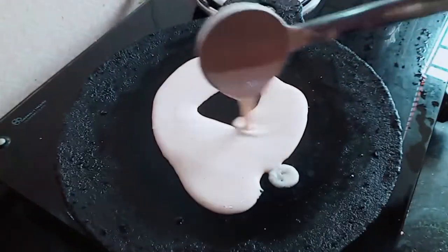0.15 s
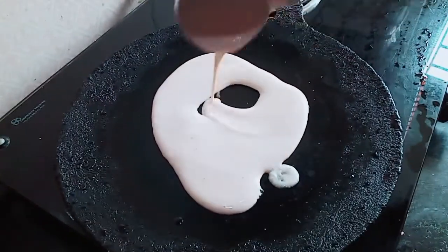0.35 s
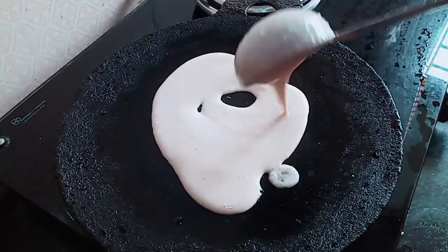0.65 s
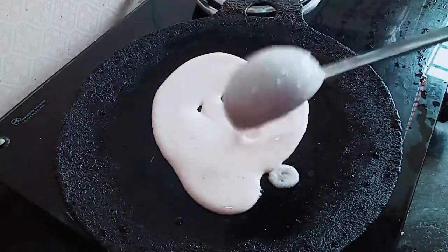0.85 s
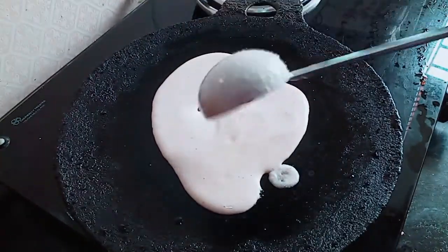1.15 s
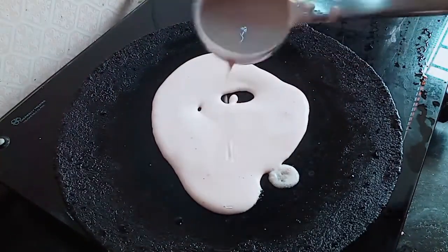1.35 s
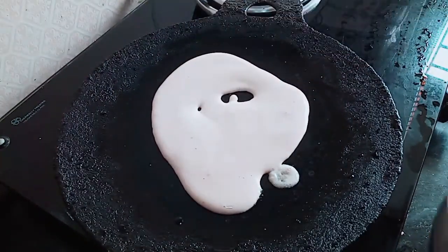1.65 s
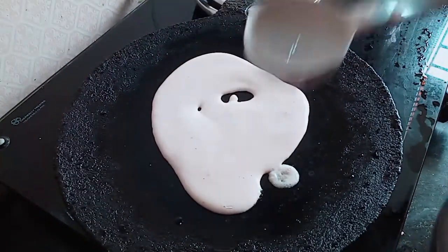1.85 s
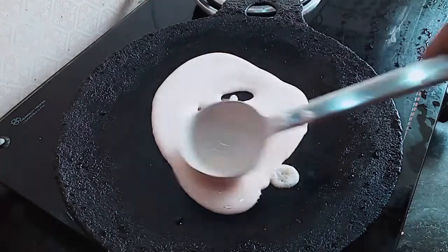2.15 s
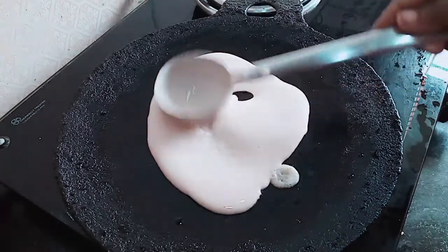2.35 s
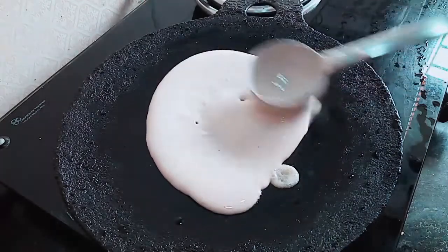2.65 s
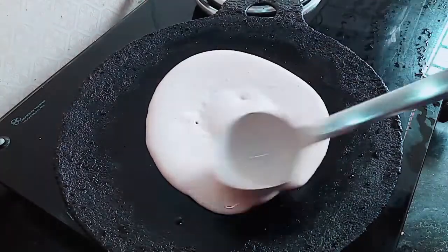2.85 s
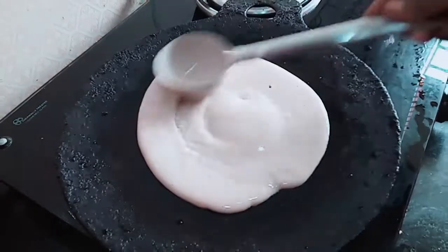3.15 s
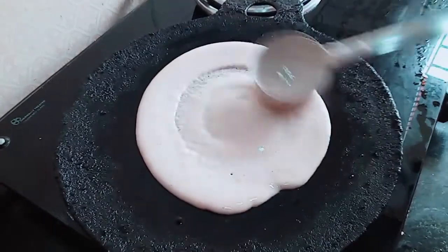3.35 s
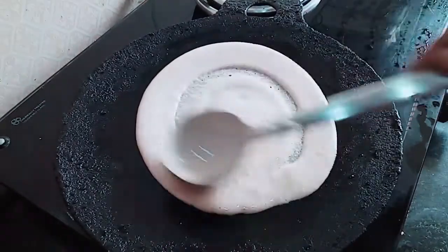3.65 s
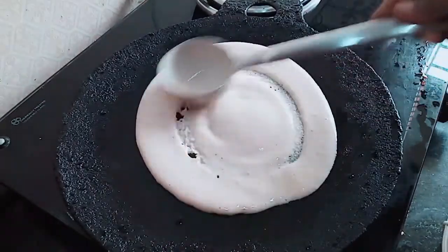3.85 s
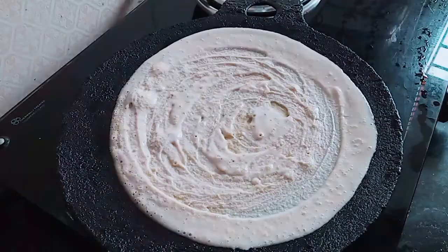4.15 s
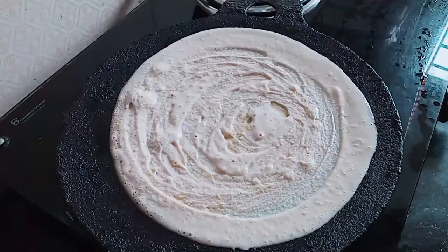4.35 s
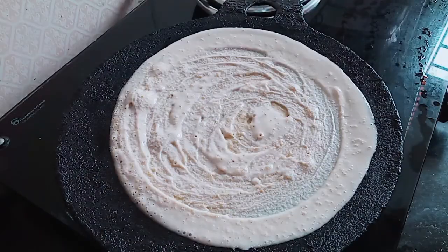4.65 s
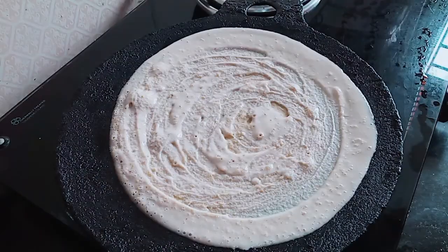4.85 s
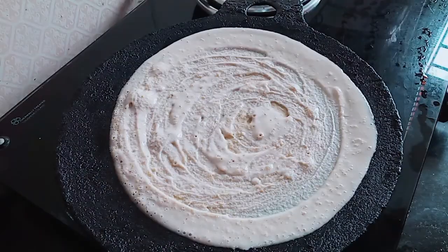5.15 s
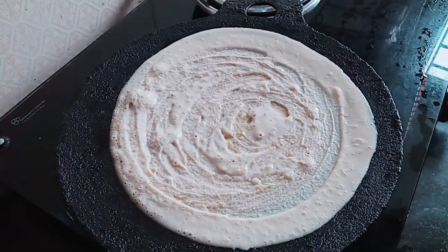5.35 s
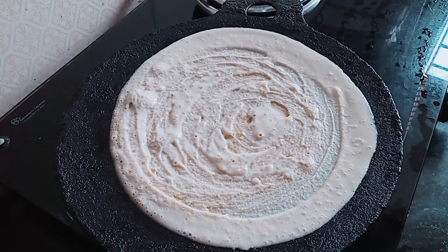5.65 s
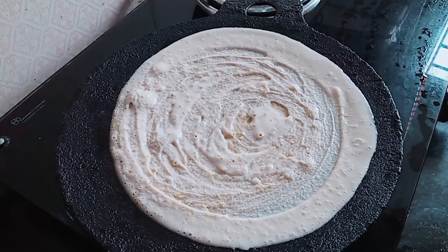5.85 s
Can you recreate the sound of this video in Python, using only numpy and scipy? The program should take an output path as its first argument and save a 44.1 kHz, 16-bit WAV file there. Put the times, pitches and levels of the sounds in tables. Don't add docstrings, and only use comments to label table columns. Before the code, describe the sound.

Wet batter sizzles and crackles on a hot iron pan over a low hum, then abruptly gives way to brief metallic ladle scrapes and knocks.

```python
import sys
import numpy as np
from scipy import signal
from scipy.fft import rfft, irfft
from scipy.io import wavfile
from scipy.ndimage import uniform_filter1d

SR = 44100
rng = np.random.default_rng(int(sys.argv[2]) if len(sys.argv) > 2 else 0)


def generate_wav(signal):
    frames = np.transpose(np.atleast_2d(signal))
    scaled = np.clip(frames, -1, 1) * 32767
    pcm = np.round(scaled).astype(np.int16)
    wavfile.write(sys.argv[1], SR, pcm)


def convert_level_to_amplitude(level_db):
    exponent = np.asarray(level_db, float) / 20
    return 10 ** exponent


N = 264600
TIME = np.arange(N) / SR
SCENE_CHANGE_S = 4.066

# t/s, vigour level/dB, large over small bubbles level/dB, rim steam over vigour level/dB
BOILING = [(0.0, -26, 4, 0.5), (0.29, -28.5, -2.5, -0.5), (0.33, -24, -5, 1.5), (0.62, -24, 0, 0.5),
           (0.98, -27, -2, -5), (1.22, -30, 3.5, -7), (1.46, -34, 3.5, 0), (1.56, -32, 0.5, 7),
           (1.8, -33, -3, -7), (2.33, -39, 1.5, -5), (2.46, -38, 3, 3.5), (2.58, -33, -8.5, 4),
           (2.78, -28.5, -3, -0.5), (2.93, -29.5, -1, -6.5), (3.08, -30.5, 1.5, 1), (3.17, -32, 1.5, -5.5),
           (3.37, -31.5, -0.5, -1), (4.06, -32.5, 0, -9.5)]
# t/s, level/dB
WETNESS = [(0.0, -34), (0.3, -37.5), (0.6, -35.5), (0.93, -38.5), (1.2, -42), (1.45, -41.5), (1.58, -38),
           (2.3, -50.5), (2.72, -46.5), (3.09, -47.5), (3.18, -57), (3.4, -51), (3.47, -49), (3.68, -47),
           (3.85, -51), (4.06, -38.5)]
# f/Hz, level/dB
BUBBLE_SPECTRUM = [(400, -10), (600, -17.5), (790, -3), (1100, -4), (1380, -1), (1950, -1.5), (2800, 0.5),
                   (3700, -2.5), (4500, -13), (6000, -8)]
# f/Hz, level/dB
STEAM_SPECTRUM = [(2470, -8), (4200, 5), (4660, -2.5), (5030, -1), (6700, -1), (7650, 3.5), (8360, 6),
                  (9950, -9.5), (11000, -13), (14300, -45), (22000, -120)]
# f/Hz, level/dB
SPRAY_SPECTRUM = [(5880, -14), (10000, -1.5), (11400, -2.5), (14900, -0.5), (15700, -9), (16000, -15)]
# f/Hz, level/dB
CRACK_SPECTRUM = [(500, -66), (2000, -18), (4500, -7), (6500, 4.5), (8300, 12.5), (10000, 3), (15000, -3.5),
                  (16500, -8)]
# t/s, peak level/dB
POUR_DROPLETS = [(0.1406, -11), (0.9098, -10), (0.367, -14), (0.782, -12), (0.9564, -9), (1.053, -22),
                 (1.195, -11), (1.271, -18), (1.34, -13), (1.3786, -15), (1.472, -12), (1.517, -7),
                 (1.6153, -10), (1.6472, -10), (1.718, -10.5), (1.7788, -13), (1.8054, -17), (1.867, -11),
                 (1.925, -11.5), (1.938, -11), (1.953, -18), (1.9817, -12.5), (2.0595, -17), (2.1412, -18),
                 (2.2495, -15.5), (1.917, -28), (2.358, -8.5), (2.448, -22)]
# t/s, peak level/dB
SPREAD_DROPLETS = [(2.6655, -14), (2.7394, -16), (2.597, -9), (2.6464, -15), (2.692, -9.5), (2.7276, -9),
                   (2.7606, -8.5), (2.802, -14), (2.8878, -16), (2.9717, -16), (3.0148, -11.5),
                   (3.062, -14), (3.118, -15), (3.044, -18), (3.4554, -19), (3.512, -9.5), (3.5523, -20),
                   (3.623, -12.5), (3.662, -9.5), (3.5803, -21), (3.714, -13), (3.742, -14), (3.764, -12.5),
                   (3.82, -16), (3.8457, -22), (3.8723, -12.5), (3.933, -12), (3.9487, -15), (3.985, -23),
                   (4.0147, -10.5)]
# t/s, peak level/dB, fizz level/dB
LATE_DROPLETS = [
    (5.2465, -12.5, -38),
    (5.259, -30, -15),
]
# t/s, rasp level/dB, rasp t60/s, ring level/dB, dullness/(0-1)
LADLE_KNOCKS = [(4.04, -32, 0.27, -22, 0.1), (4.156, -36, 0.2, -32, 0.4), (4.207, -40.5, 0.28, -47, 0.7),
                (4.257, -38, .2, -40, 0.5), (4.269, -26.5, 0.19, -32, 0), (4.283, -30.5, 0.8, -25, 0.86),
                (4.322, -26.5, 0.34, -32, 0.4), (4.335, -33, 0.26, -28, 0.4), (4.346, -18, 0.11, -24, 0.14),
                (4.358, -32, 0.33, -19, 0.8), (4.404, -26, 0.09, -19, 0.75), (4.412, -26, 0.11, -32, 0.99),
                (4.425, -39, 0.1, -30, 1), (4.46, -38, 1, -36, 0.3), (4.518, -9.5, 0.057, -16, 0),
                (4.533, -20, 0.18, -30, 0.46), (4.548, -28, 0.19, -31, 0.98), (4.605, -51, .2, -37, .5)]
# t/s, f/Hz, level/dB, t60/s
SINGLE_RINGS = [(4.05, 8700, -32, 0.27), (4.05, 7600, -32, .2), (4.05, 6400, -36, .2),
                (4.05, 9250, -38, .3), (4.05, 11600, -45, .25), (4.05, 12400, -44, 0.28),
                (4.05, 13700, -48, .3), (4.156, 8200, -32, 0.091), (4.165, 3900, -42, 0.43),
                (4.207, 5430, -45, .2), (4.207, 6500, -42, .1), (4.269, 6400, -37, .1),
                (4.33, 8000, -21, .1), (4.347, 3450, -24, .15), (4.347, 14500, -24, .08),
                (4.355, 12400, -30, .15), (4.36, 6400, -26, 0.18), (4.39, 14200, -34, .1),
                (4.517, 3400, -25, 0.028), (4.518, 6200, -22, .06), (4.518, 7900, -7, 0.039),
                (4.518, 9280, -22, 0.25), (4.519, 14800, -18, 0.055), (4.55, 5430, -34, 0.32),
                (4.55, 14200, -34, .15), (4.604, 5430, -39, .15)]
# f/Hz, level/dB, t60/s
VESSEL_MODES = [(1250, -14, .1), (2130, 2, .12), (2460, -10, .12), (3400, 21, 0.056), (3900, -10, .15),
                (5470, -12, 0.2), (6400, -2, .15), (7200, -7, .1), (7900, -8, 0.068), (8200, -7, 0.22),
                (8705, -8, .35), (8950, 1, 0.24), (10400, -12, .15), (11610, -14, .25), (12400, -12, .2),
                (13600, -16, .2), (14500, -5, 0.079)]
# f/Hz, level/dB
BRIGHT_RASP = [(470, -63), (800, -32), (1460, -11), (2050, -17), (2350, -30), (2700, -7), (3420, -5.5),
               (5050, -14.5), (8340, -2), (9810, -10), (12900, -18), (15200, -18), (16000, -33)]
# f/Hz, level/dB
DULL_RASP = [(290, -33), (500, -11), (740, -1.5), (831, -13), (1210, -1), (1360, -2.5), (1570, -1),
             (2570, 1), (3110, -3), (3590, 1), (5390, -17), (8330, -21), (16000, -37)]
# t/s, peak level/dB
PAN_BUMPS = [
    (3.7689, -5),
    (3.777, -27),
    (3.79, -32),
    (3.804, -18),
    (3.831, -25),
]
# f/Hz, level/dB, t60/s
PAN_MODES = [(236, -21, .1), (311, -3, 0.3), (398, -6, .32), (448, -2, 0.14), (563, 7, 0.042),
             (680, -2, 0.033), (810, 11.5, 0.036), (910, 4, 0.05)]
# t of one swell/s, rate/Hz
BLADE_SWELLS = [(2.77, 3.13), (5.3, 2.34)]
# f/Hz, level/dB
AIR_SPECTRUM = [(20, -20), (50, -11), (70, -8), (90, 0), (140, -5), (230, -12), (400, -9), (700, -11),
                (1200, -16), (3500, -21.5), (5500, -32.5), (8300, -24.5), (11000, -26.5), (13000, -42)]
# f/Hz, width/Hz, level/dB
DUCT_MODES = [(157, 7.3, 1.5), (205.4, 6.4, -4.5), (257.4, 4.9, 1), (316.5, 15, -4.5), (329, 9.1, 4.5),
              (377.3, 27, 1), (513.6, 16, -4.5), (553, 35, -6), (803, 13, -5.5)]


def sizzle():
    vigour_db, size_db, rim_db = curve(BOILING)
    spray_db, = curve(WETNESS)
    flurry = 1.7 * walk(24.73)
    fine = room(bursts(share=.08, spread_db=1.5))
    large = bubbles(np.geomspace(550, 1750, num=7)) * convert_level_to_amplitude(vigour_db + size_db / 2 + 0.083 * flurry)
    middling = bubbles(np.geomspace(2100, 2550, num=2))
    middling = middling * convert_level_to_amplitude(vigour_db - 0.25 * size_db - 3.5 + 0.17 * flurry)
    small = bubbles(np.geomspace(3100, 4600, num=3))
    small = small * convert_level_to_amplitude(vigour_db - 0.59 * size_db - 3.0 + 0.2 * flurry)
    steam = level(colour(fine, STEAM_SPECTRUM), 0) * convert_level_to_amplitude(vigour_db + rim_db + flurry - 1.0)
    spray = level(colour(fine, SPRAY_SPECTRUM), 0) * convert_level_to_amplitude(spray_db + 1.2 * flurry - 1.0)
    return large + middling + small + steam + spray + crackle(spray_db, vigour_db)


def bubbles(sizes_hz):
    out = 0
    for hz in sizes_hz:
        b, a = signal.iirpeak(hz, 7.0, SR)
        ringing = level(signal.lfilter(b, a, bursts(share=.05, spread_db=3.5)), 0)
        out = out + ringing * np.sqrt(hz) * convert_level_to_amplitude(2.02 * walk(21.96))
    return level(colour(room(out), BUBBLE_SPECTRUM), 0)


def crackle(spray_db, vigour_db):
    cracks = level(colour(room(bursts(share=.006, spread_db=4.0)), CRACK_SPECTRUM), 2.0)
    ticks = level(colour(room(bursts(share=.002, spread_db=4.0)), SPRAY_SPECTRUM), -5)
    pops = level(colour(room(bursts(share=.001, spread_db=3.5)), BUBBLE_SPECTRUM), -12)
    return (cracks + ticks) * convert_level_to_amplitude(spray_db) + pops * convert_level_to_amplitude(vigour_db)


def droplets(count=57):
    chance = rng.random((count, 2))
    s = chance[:, 0] * SCENE_CHANGE_S
    wet_db = np.interp(s, *np.transpose(WETNESS))
    stray_db = wet_db / 2 - 2 - 2 * np.log(1 - .9 * chance[:, 1])
    fizz_db = -25
    events = POUR_DROPLETS + SPREAD_DROPLETS + list(zip(s, stray_db))
    return spits([(t, db, fizz_db) for t, db in events])


def spits(events):
    crack = np.zeros(N)
    t = TIME[:SR // 30]
    burst_lag_s = .0007
    for s, peak_db, fizz_db in events:
        sound = convert_level_to_amplitude(fizz_db) * np.exp(-t / 0.01) * rng.standard_normal(len(t))
        sound[0] -= 1
        sound[rng.integers(4, 20)] += .3
        add(crack, s + burst_lag_s, convert_level_to_amplitude(peak_db) * sound)
    return room(convert_level_to_amplitude(5.5) * colour(crack, CRACK_SPECTRUM) + convert_level_to_amplitude(2.5) * colour(crack, BUBBLE_SPECTRUM))


def ladle():
    bright, dull, ringing = np.zeros((3, N))
    t = TIME[:SR // 2]
    for s, rasp_db, t60, ring_db, dullness in LADLE_KNOCKS:
        fade = convert_level_to_amplitude(rasp_db - 60 * t / t60)
        add(bright, s, fade * np.sqrt(np.clip(1 - dullness, 0, 1)))
        add(dull, s, fade * np.sqrt(np.clip(dullness, 0, 1)))
        add(ringing, s, convert_level_to_amplitude(ring_db) * ring(VESSEL_MODES, rough=.03, spread_db=4))
    for s, hz, db, t60 in SINGLE_RINGS:
        add(ringing, s, convert_level_to_amplitude(db) * ring([(hz, 0, t60)], rough=.05, spread_db=0))
    grit, drag = (level(bursts(share=0.36, spread_db=3.0), 0) * convert_level_to_amplitude(0.98 * walk(120)) for _ in range(2))
    rasp = colour(grit * bright, BRIGHT_RASP) + colour(drag * dull, DULL_RASP)
    return room(rasp) + ringing


def bumps():
    out = np.zeros(N)
    for s, peak_db in PAN_BUMPS:
        add(out, s, convert_level_to_amplitude(peak_db) * ring(PAN_MODES, rough=.01, spread_db=0))
    soft = signal.butter(2, [200, 2300], "bandpass", fs=SR, output="sos")
    return room(signal.sosfilt(soft, out))


def ring(modes, rough, spread_db):
    t = TIME[:SR // 3]
    share = convert_level_to_amplitude(spread_db * rng.standard_normal(len(modes)))
    waver = rough * np.cumsum(rng.standard_normal((len(modes), len(t))), axis=1)
    y = np.zeros(len(t))
    for gain, phase, (hz, db, t60) in zip(share, waver, modes):
        y += gain * convert_level_to_amplitude(db - 60 * t / t60) * np.sin(2 * np.pi * hz * t + phase)
    return y / np.max(np.abs(y))


def fan():
    motor_hz, blade_hz = 99.79, 121.41
    run_s, skip_s = .028, .0317
    after = TIME > SCENE_CHANGE_S
    early, late = (np.cos(2 * np.pi * rate * (TIME - s)) for s, rate in BLADE_SWELLS)
    duck_db = -1.5 * np.exp(-((TIME - 4.48) / 0.13) ** 2)
    motor_db = -23 - 1.46 * after + duck_db + 0.32 * walk(5.5)
    blade_db = -32 + 1.7 * np.where(after, 1.6 * late, early) + 1.4 * walk(7)
    clock = 2 * np.pi * (TIME + run_s + skip_s * after)
    motor = convert_level_to_amplitude(motor_db) * np.cos(motor_hz * clock + 0.04 * walk(4.9))
    blade = convert_level_to_amplitude(blade_db) * np.cos(blade_hz * clock + 0.16 * walk(4.46))
    return np.sqrt(2) * (motor + blade)


def kitchen():
    air = rfft(rng.standard_normal(N))
    hz = np.arange(len(air)) * SR / N
    points = np.array(AIR_SPECTRUM)
    outline = convert_level_to_amplitude(np.interp(np.log(hz + 1), np.log(points[:, 0]), points[:, 1]))
    duct = sum(convert_level_to_amplitude(db) / (1 + ((hz - f) / (width / 2)) ** 2) for f, width, db in DUCT_MODES)
    return level(irfft(air * (outline + convert_level_to_amplitude(-4.5) * duct), N), -36.5) * convert_level_to_amplitude(0.4 * walk(6))


def room(x):
    t = TIME[:SR // 2]
    t60_s, wash_db = .3, -7.5
    tail = rng.standard_normal(len(t)) * convert_level_to_amplitude(-60 * t / t60_s) * (1 - np.exp(-(t / 0.002) ** 2))
    return x + convert_level_to_amplitude(wash_db) * signal.fftconvolve(x, tail / np.sqrt(np.sum(tail ** 2)))[:N]


def bursts(share, spread_db):
    chance = rng.random(N)
    size = np.minimum(rng.exponential(size=N), 5.5)
    return (chance < share) * convert_level_to_amplitude(spread_db * size) * rng.choice([-1, 1], N)


def colour(x, points):
    size = 2048
    hz, db = np.transpose(points)
    bins_hz = np.arange(size // 2 + 1) * SR / size
    gain = np.interp(np.log(bins_hz + 1), np.log(hz), db, left=-60, right=-60)
    cepstrum = irfft(gain * np.log(10) / 20)
    cepstrum[1:size // 2] *= 2
    cepstrum[size // 2 + 1:] = 0
    response = irfft(np.exp(rfft(cepstrum)))
    return signal.fftconvolve(x, response / np.sqrt(np.sum(response ** 2)))[:N]


def walk(rate):
    k = int(SR / rate)
    held = np.repeat(rng.standard_normal(N // k + 1), k)
    return 1.3 * uniform_filter1d(uniform_filter1d(held, k), k)[:N]


def curve(table):
    s, *columns = np.transpose(table)
    return [np.interp(TIME, s, c) for c in columns]


def level(x, db):
    return x * convert_level_to_amplitude(db) / np.sqrt(np.mean(x ** 2))


def add(out, s, sound):
    i = int(s * SR)
    out[i:i + len(sound)] += sound[:N - i]


def scene():
    before = TIME < SCENE_CHANGE_S
    wet_pan = sizzle() + droplets() + bumps()
    steel = ladle() + spits(LATE_DROPLETS)
    mix = wet_pan * before + steel * ~before + fan() + kitchen()
    return mix[None]


def band_limit(x):
    return signal.sosfilt(signal.butter(12, 16600, fs=SR, output="sos"), x)


def record(dry):
    top = signal.ellip(12, .3, 60, 15520, fs=SR, output="sos")
    rounded = np.tanh(1.05 * dry) / 1.05
    return band_limit(signal.sosfilt(top, rounded))


dry = scene()
out = record(dry)
generate_wav(out)
```